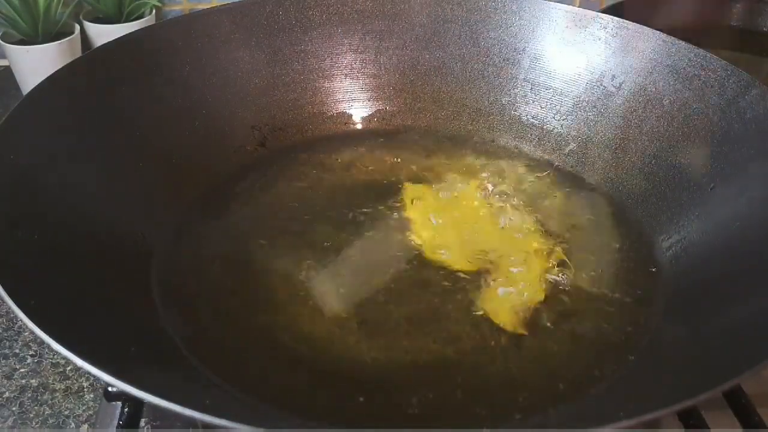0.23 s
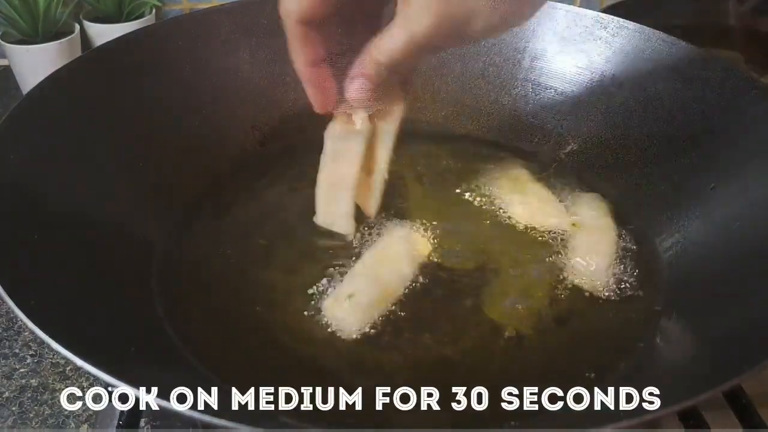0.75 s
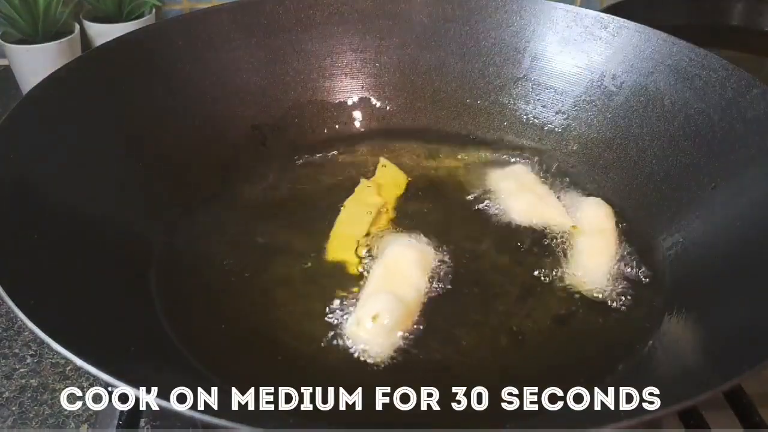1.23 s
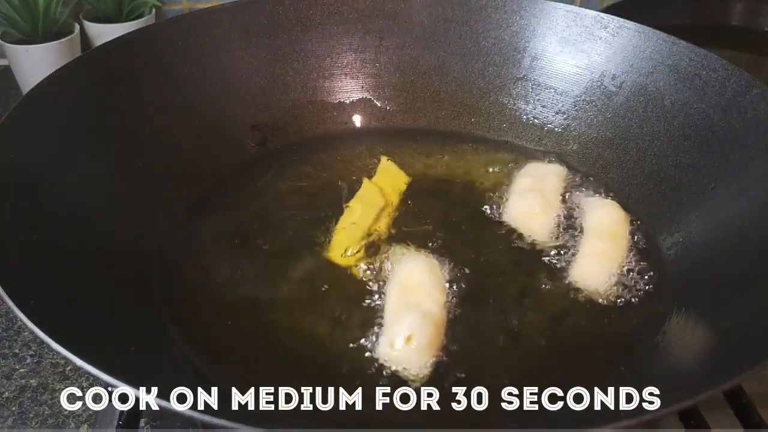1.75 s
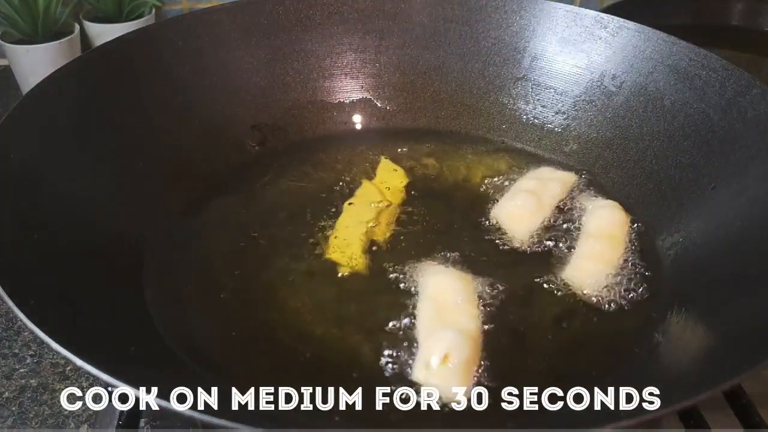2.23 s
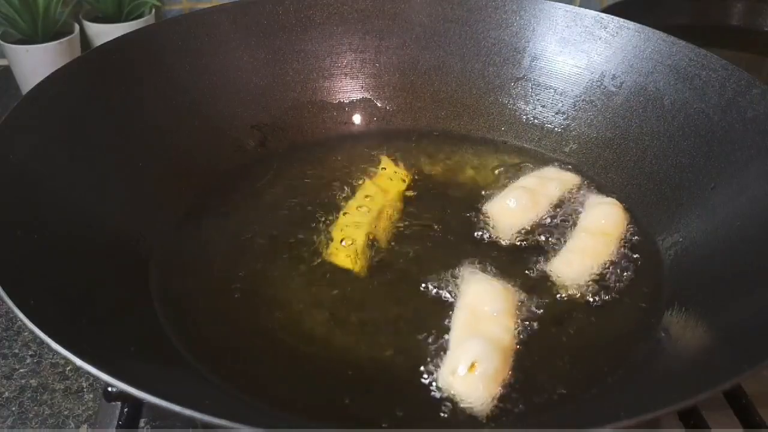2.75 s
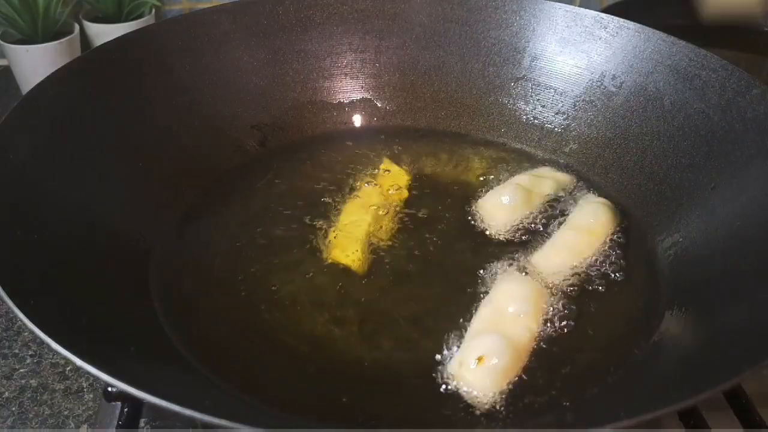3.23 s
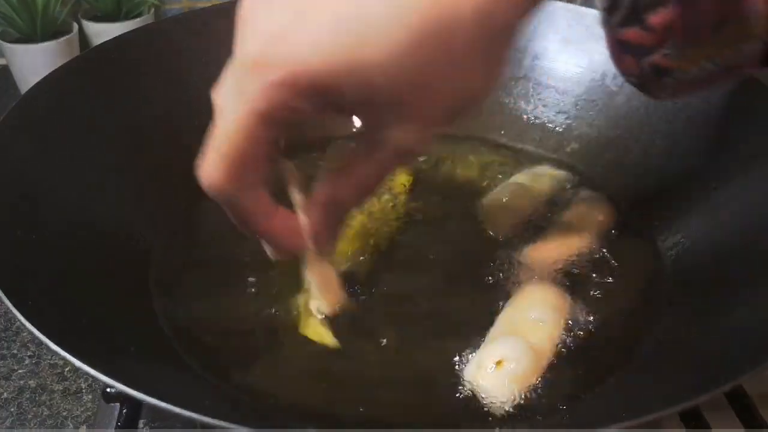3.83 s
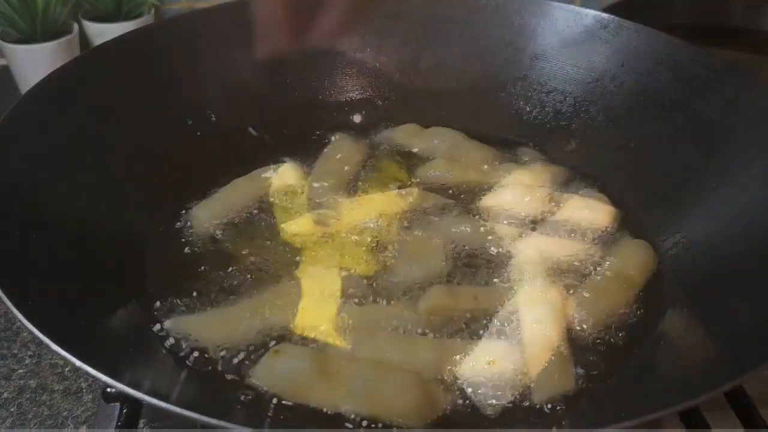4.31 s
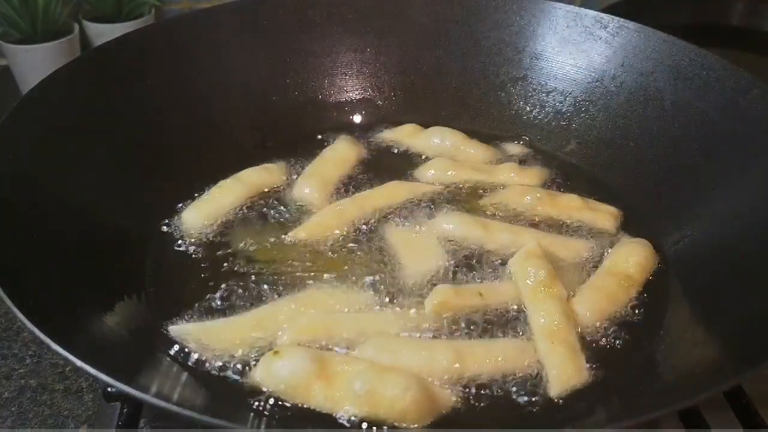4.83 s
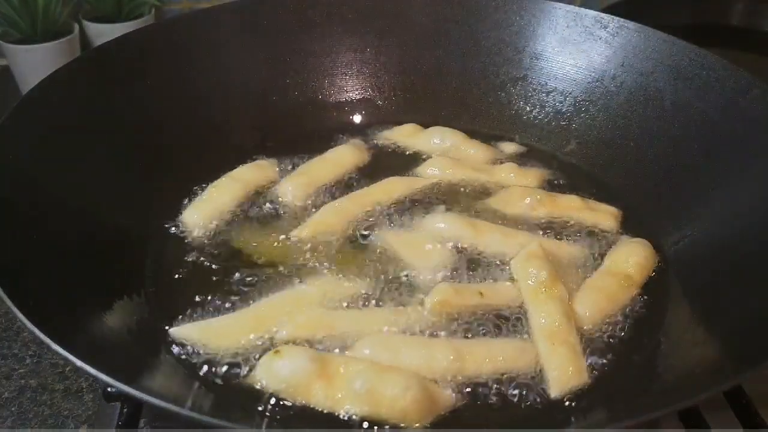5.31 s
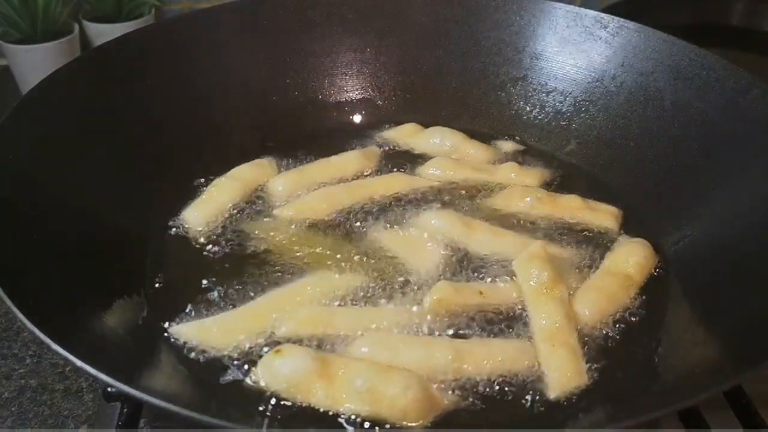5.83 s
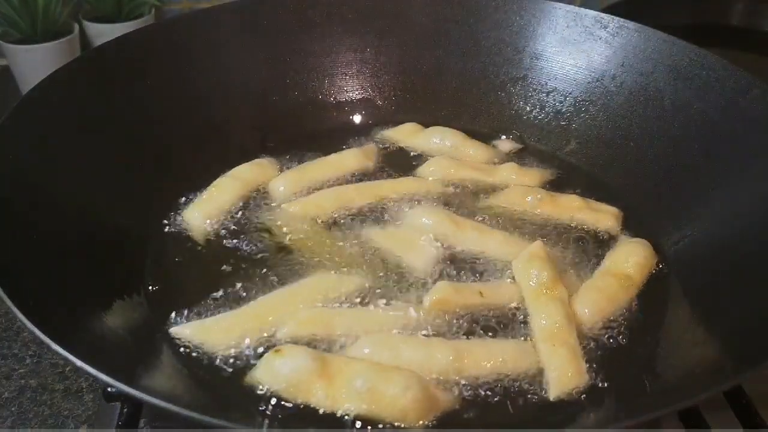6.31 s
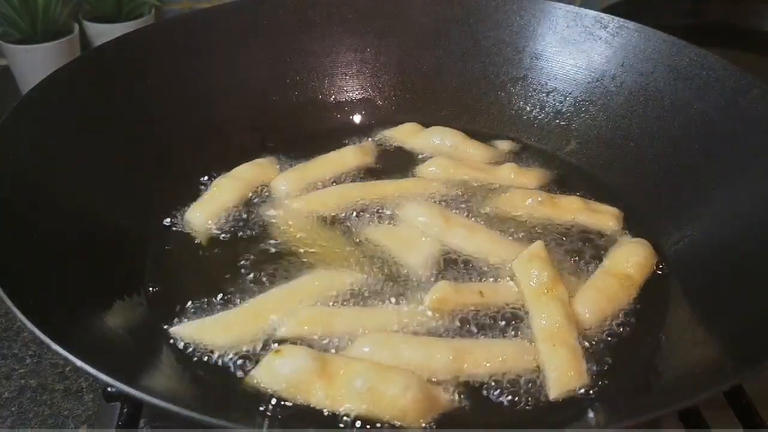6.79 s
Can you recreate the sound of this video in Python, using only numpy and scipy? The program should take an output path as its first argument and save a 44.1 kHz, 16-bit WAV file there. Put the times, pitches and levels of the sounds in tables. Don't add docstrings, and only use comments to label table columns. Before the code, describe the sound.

Outdoors in a reverberant wood, a high trill opens and fades within a second. Sharp upward whistles come in pairs, slightly right, while low chups and faint whistles answer. Around four seconds a finch on the left sings a quick descending song with flourishes and a buzzing close. Distant traffic rushes dully throughout; stereo microphone, birds at moderate distance.

```python
import sys
import numpy as np
from scipy import signal
from scipy.io import wavfile
from scipy.ndimage import uniform_filter1d, map_coordinates

SR = 44100
rng = np.random.default_rng(int(sys.argv[2]) if len(sys.argv) > 2 else 0)


def gain_from_decibels(decibels):
    exponent = np.asarray(decibels, float) / 20
    return 10 ** exponent


def put_to_file(sound):
    columns = np.atleast_2d(sound).T
    safe = np.clip(columns, -1, 1)
    whole_steps = np.round(safe * 32767)
    wavfile.write(sys.argv[1], SR, whole_steps.astype(np.int16))


N = 311346

# frequency in Hz, level in dB per Hz.
AIR = [(4500, -54), (6500, -10), (8000, -2.5), (10000, -1), (13000, -7), (15600, -9.5), (17000, -20)]
AIR_ALIKE = [(1000, .05)]
LEAD = 1
WAVER, WAVER_RATE = .017, 90
RATTLE_RATE, BUZZ_RATE = 136, 65
WARBLER_SIDE_DB, FINCH_SIDE_DB = 7, 6


def unit(x):
    return x / np.sqrt(np.mean(x ** 2) + 1e-20)


def along(points, hz):
    f, v = np.transpose(points)
    return np.interp(np.log(hz + 1), np.log(f + 1), v)


def wobble(rate, size=N):
    knots = rng.standard_normal(size // 40 + 4)
    return map_coordinates(knots, [np.arange(size) * rate / SR])


def glide(length, from_hz, to_hz, edge=.25, waver=0):
    hz = np.linspace(from_hz, to_hz, max(int(length * SR), 8))
    hz = hz * (1 + waver * wobble(WAVER_RATE, size=len(hz)))
    envelope = signal.windows.tukey(len(hz), np.clip(edge, 0, 1))
    return np.sqrt(2) * envelope * np.sin(2 * np.pi * np.cumsum(hz) / SR)


def add(air, s, sound, pan_db, blur_db, near_db, far_db, near_t60=.2, far_t60=1.3, lag=0, straight_db=0):
    t = np.arange(SR) / SR

    def fade(db, t60):
        return gain_from_decibels(db - 60 * t / t60) * np.sqrt(2 * np.log(1000) / t60 / SR)

    side = gain_from_decibels([[pan_db / 2], [-pan_db / 2]])
    depth_onset = 1 - np.exp(-t / 0.033)
    scatter = fade(near_db, near_t60) + fade(far_db, far_t60) * depth_onset
    clumps = gain_from_decibels(2.5 * np.array([wobble(36.0, size=SR), wobble(43.0, size=SR)]))
    decay = side * fade(blur_db, 0.023) + np.sqrt(side) * clumps * scatter
    leaves = signal.butter(4, 7000, fs=SR)
    path = signal.lfilter(*leaves, decay * rng.standard_normal((2, SR)))
    path[[0, 1], [0, lag]] += gain_from_decibels(straight_db) * side[:, 0]
    heard = signal.fftconvolve(sound[None], path, axes=1)
    spot = air[:, round((s + LEAD) * SR):][:, :heard.shape[1]]
    spot += heard[:, :spot.shape[1]]


def add_caller(air):
    # clearing of the tone in seconds, hold in seconds, pitch at the turn in Hz,
    # pitch at the end in Hz, level in dB.
    calls = [
        (1.327, 0.041, 4278, 4222, -21),
        (1.548, 0.028, 4376, 4374, -21),
        (2.9, 0.044, 4132, 4090, -23),
        (3.157, 0.0392, 4345, 3950, -22),
        (7.068, 0.038, 4260, 4200, -28),
    ]
    # time from clearing in seconds, pitch in Hz, whistle and rasp in dB
    climb = [
        (-.046, 1850, -44, -22),
        (-.035, 2300, -32, -9),
        (-.018, 2950, -22, -8),
        (-.008, 3450, -14, -22),
        (-.003, 3900, -8, -35),
        (0, 4196, -2.5, -42),
    ]
    # time from clearing in seconds, frequency in Hz.
    second_pitch = [(-.046, 2800), (-.033, 3600), (-.012, 4200)]
    # frequency ratio, level in dB over the rasp.
    second_lines = [(1, -13), (1.198, -20)]
    # frequency in Hz,
    # gain in dB.
    overtone_gains = [(2800, -14.5), (3900, 0), (4500, -6), (5500, -9.5), (6600, -13), (7300, -30), (8000, -43),
                      (13000, -43.5)]
    turn_share, hold_loss_db = 0.49, -3
    release_s, release_db = .006, -14
    overtone_db = -8
    breath = signal.butter(3, [4200, 7000], "band", fs=SR)

    for clear_s, hold, turn_hz, end_hz, held_db in calls:
        clear_rasp_db = climb[-1][-1]
        held = [(turn_share * hold, turn_hz, 0, clear_rasp_db),
                (hold, end_hz, hold_loss_db, clear_rasp_db),
                (hold + release_s, end_hz, release_db, clear_rasp_db)]
        s, *cols = np.transpose(list(climb) + held)
        t = np.arange(s[0], s[-1], 1 / SR)
        hz, whistle_db, rasp_db = (np.interp(t, s, c) for c in cols)
        whistle_db, rasp_db = whistle_db + held_db, rasp_db + held_db
        phase = 2 * np.pi * np.cumsum(hz) / SR

        def partial(k, db):
            level_db = db + along(overtone_gains, k * hz) + 4.2 * wobble(330, size=len(hz))
            return gain_from_decibels(level_db) * np.sin(k * phase)

        voice = gain_from_decibels(whistle_db + .7 * wobble(110, size=len(hz))) * np.sin(phase)
        voice += partial(2, whistle_db + overtone_db) + partial(3, whistle_db + overtone_db)
        voice += partial(2, rasp_db - 7) + partial(5 / 2, rasp_db - 15)
        voice += partial(4, rasp_db - 1) + partial(9 / 2, rasp_db - 3)
        second = 2 * np.pi * np.cumsum(np.interp(t, *np.transpose(second_pitch))) / SR
        for ratio, db in second_lines:
            voice += gain_from_decibels(rasp_db + db + 5 * wobble(330, size=len(hz))) * np.sin(ratio * second)
        voice += gain_from_decibels(rasp_db - 13) * signal.lfilter(*breath, rng.standard_normal(len(hz)))
        voice *= signal.windows.tukey(len(hz), .12)
        add(air, clear_s + s[0], voice, pan_db=-12, blur_db=-21, near_db=-13, far_db=-6,
            near_t60=0.28, far_t60=1.33, lag=2)


def finch_song():
    # start in seconds, high pitch in Hz,
    # low pitch in Hz, high level in dB, low level in dB.
    steps = [
        (4.068, 5490, 3970, -65, -53),
        (4.268, 4860, 3650, -54, -52),
        (4.460, 4800, 3600, -52, -50),
        (4.651, 4630, 3230, -47, -47.5),
        (4.846, 4050, 3040, -43, -49),
    ]
    # start in seconds, length in seconds, start pitch in Hz,
    # end pitch in Hz, level in dB.
    links = [(3.97, 0.05, 5800, 5600, -69), (4.79, 0.027, 4870, 5020, -55), (4.992, 0.024, 4380, 4030, -52),
             (5.02, 0.018, 3670, 3980, -42), (5.041, 0.022, 3410, 2600, -41.5),
             (5.074, 0.12, 2540, 2350, -65), (5.203, 0.0228, 2750, 3420, -45),
             (5.219, 0.031, 3460, 3235, -45), (5.352, 0.03, 3800, 3730, -63),
             (5.452, 0.022, 3290, 3040, -48.5), (5.797, 0.033, 4235, 4190, -49),
             (5.548, 0.017, 4000, 4380, -52), (5.583, 0.0244, 2910, 2590, -49),
             (5.815, 0.07, 7450, 7260, -74), (5.868, 0.021, 4210, 4130, -47),
             (5.929, 0.081, 3510, 3110, -53)]
    # start in seconds, length in seconds, start pitch in Hz,
    # end pitch in Hz, level in dB.
    lead_ins = [
        (4.231, 0.035, 6300, 5950, -57),
        (4.42, 0.04, 6500, 6000, -54.5),
        (4.608, .05, 5200, 5970, -53.5),
        (4.795, 0.034, 4670, 5100, -46),
        (4.877, .03, 3470, 2900, -58),
        (4.975, .04, 4780, 5200, -54),
        (5.078, .045, 3210, 2880, -41),
        (4.69, .04, 3900, 3360, -42),
        (5.705, .068, 5850, 5200, -51),
    ]
    # start in seconds, length in seconds, start pitch in Hz,
    # end pitch in Hz, level in dB.
    buzz = [
        (5.768, .031, 4370, 4150, -40),
        (5.812, .062, 3590, 3290, -35.5),
        (5.874, .016, 3050, 3100, -34.5),
        (5.891, .031, 2980, 2790, -39.5),
        (5.925, .031, 2504, 2300, -41),
    ]
    # start in seconds, level in dB.
    flourishes = [
        (5.315, -43),
        (5.492, -45),
    ]
    # start after the flourish in seconds, length in seconds,
    # start pitch in Hz, end pitch in Hz, level in dB over the flourish.
    opening = [
        (0.001, .03, 5000, 4200, -1),
        (.032, .022, 2780, 2274, -2),
    ]
    # start after the flourish in seconds, length in seconds,
    # start pitch in Hz, end pitch in Hz, level in dB over the flourish.
    closing = [
        (-.002, .009, 5250, 5050, -5),
        (.006, .009, 4900, 4200, -3),
        (.014, .009, 4150, 3550, 2),
        (.023, .011, 3450, 3000, 2),
        (.037, .014, 2800, 2150, -6),
        (.058, .014, 2050, 2450, -4),
        (.072, .012, 2750, 3250, 0),
        (.083, .016, 3150, 3400, 2),
    ]
    scoop_s, scoop_db, scoop_from = .006, -3.5, .85
    high_s, low_at_s, low_s = .03, .052, .085
    drop_at_s, drop_s, drop_db = .032, .018, -.5
    drop_from, drop_to, sag = .95, .88, .98

    notes = list(links)
    for s, high_hz, low_hz, high_db, low_db in steps:
        louder_db = max(low_db, high_db)
        notes += [
            (s - scoop_s, scoop_s, scoop_from * high_hz, high_hz, high_db + scoop_db),
            (s, high_s, high_hz, sag * high_hz, high_db),
            (s + drop_at_s, drop_s, drop_from * high_hz, drop_to * low_hz, louder_db + drop_db),
            (s + low_at_s, low_s, low_hz, sag * low_hz, low_db)]

    def flourish(parts):
        return [(s + after, *shape, db + over_db)
                for s, db in flourishes for after, *shape, over_db in parts]

    rattles = [(*row, RATTLE_RATE) for row in list(lead_ins) + flourish(opening)]
    rattles += [(*row, BUZZ_RATE) for row in buzz]
    return notes + flourish(closing), rattles


def add_finch(air):
    notes, rattles = finch_song()
    for s, length, from_hz, to_hz, db in notes:
        note = glide(length, from_hz, to_hz, edge=0.049, waver=WAVER / 2)
        note = gain_from_decibels(db - 4.5 + 3 * wobble(81, size=len(note))) * note
        add(air, s, note, FINCH_SIDE_DB, blur_db=-2.5, near_db=4, far_db=4.5,
            near_t60=0.5, far_t60=1.5, straight_db=2)
    for s, length, from_hz, to_hz, db, rate in rattles:
        centres = np.linspace(from_hz, to_hz, max(round(length * rate), 1))
        if rate == BUZZ_RATE:
            fill, swing_hz, straight_db, blur_db, near_db = .55, 520, 6, -2, 2
        else:
            fill, swing_hz, straight_db, blur_db, near_db = .7, 750, 1, 1, 3
            centres = centres + (swing_hz / 4) * rng.standard_normal(len(centres))
        gap = int((1 - fill) / rate * SR)
        flicks = []
        for hz in centres:
            flick = glide(fill / rate, hz + swing_hz, hz - swing_hz, edge=0.66, waver=WAVER)
            flicks.append(np.pad(flick, (0, gap)))
        add(air, s, gain_from_decibels(db - 11.0) * np.concatenate(flicks), FINCH_SIDE_DB, blur_db, near_db,
            far_db=10, near_t60=0.29, far_t60=1.0, straight_db=straight_db)


def add_warbler(air):
    # time of the turn in seconds, top pitch in Hz, level in dB.
    syllables = [(-.16, 6100, -45), (-.085, 6100, -45), (-.010, 6200, -42), (0.067, 6300, -38),
                 (0.143, 6400, -39), (0.221, 6300, -46), (0.302, 6700, -51), (0.381, 6840, -50),
                 (.458, 6800, -44), (0.536, 6500, -43), (.620, 6600, -50), (0.706, 6700, -52),
                 (0.792, 6700, -53), (0.884, 6700, -52)]
    # time after the turn in seconds, share of the top pitch, level in dB.
    swoop = [
        (-.016, .86, -9),
        (-.011, .93, -3),
        (0, 1.0, 0),
        (.005, .84, -2),
        (.010, .89, -1),
        (.014, .72, -6),
        (.019, .58, -17),
        (.024, .4, -30),
    ]
    scatter_near_db, scatter_depth_db, fading_db_per_s = -51.5, -39.5, -3
    tick_db, tick_wet_db = -18, 4

    after, *cols = np.transpose(swoop)
    t = np.arange(after[0], after[-1], 1 / SR)
    share, fade_db = (np.interp(t, after, c) for c in cols)
    for s, top_hz, db in syllables:
        wavering = share * (1 + WAVER * wobble(WAVER_RATE, size=len(share)))
        tone = np.sin(2 * np.pi * top_hz * np.cumsum(wavering) / SR)
        syllable = np.sqrt(2) * gain_from_decibels(db + fade_db) * signal.windows.tukey(len(share), .25) * tone
        octave = gain_from_decibels(db - 10) * glide(0.008, 7100, 5000, edge=0.6)
        syllable[-len(octave) - 220:-220] += octave
        tick = gain_from_decibels(db + tick_db) * glide(0.0091, 4110, 5180, edge=0.82, waver=WAVER)
        fading_db = fading_db_per_s * s - db
        add(air, s + after[0], syllable, WARBLER_SIDE_DB, blur_db=-33.0,
            near_db=scatter_near_db + fading_db, far_db=scatter_depth_db + fading_db,
            near_t60=0.45, far_t60=0.94)
        wet_db = fading_db - tick_db + tick_wet_db
        add(air, s - .004, tick, WARBLER_SIDE_DB / 2, blur_db=0,
            near_db=scatter_near_db + wet_db, far_db=scatter_depth_db + wet_db,
            near_t60=0.3, far_t60=0.98)


def add_far_birds(air):
    # start in seconds, level in dB.
    chup_times = [
        (1.036, -49),
        (2.08, -41),
        (2.208, -45),
        (2.43, -46),
        (2.582, -41),
        (2.735, -47),
    ]
    # start in seconds, length in seconds, start pitch in Hz,
    # end pitch in Hz, level in dB.
    ahead = [(.785, .04, 1800, 1520, -45), (.83, .025, 1334, 1200, -40), (.908, 0.026, 2360, 2700, -47),
             (.938, 0.05, 2380, 2600, -44), (.995, 0.022, 2600, 2700, -49), (1.02, 0.022, 2900, 3200, -49),
             (1.05, 0.021, 2700, 2550, -49), (1.11, 0.025, 2350, 2200, -47), (1.17, 0.03, 2300, 2750, -49),
             (1.708, 0.013, 2180, 2560, -44), (1.724, .045, 2460, 2600, -43),
             (1.903, 0.011, 2170, 2570, -50), (1.914, 0.033, 2546, 2480, -43.5)]
    # start in seconds, length in seconds, start pitch in Hz,
    # end pitch in Hz, level in dB.
    left = [
        (1.05, 0.046, 4100, 4000, -57.5),
        (1.783, 0.14, 5380, 4955, -63.5),
        (2.475, 0.11, 4550, 4560, -56.5),
        (2.545, 0.042, 4320, 4320, -53.5),
        (2.625, 0.085, 3710, 3710, -58),
        (2.70, .09, 3830, 3980, -59),
        (2.745, 0.14, 4200, 4150, -57),
    ]
    # start in seconds, length in seconds, start pitch in Hz,
    # end pitch in Hz, level in dB.
    right = [
        (6.295, .08, 4340, 4310, -59),
        (6.42, .07, 4150, 4150, -67),
        (6.47, .13, 4340, 4350, -62),
        (6.63, .06, 4350, 4360, -65),
        (6.71, .06, 4340, 4380, -59),
        (6.66, .2, 4150, 4150, -69),
        (6.8, .17, 4350, 4340, -66),
    ]
    chups = [(s, .022, 2650, 1900, db) for s, db in chup_times]
    low_wet_db, high_wet_db = -5.5, 1.5
    birds = [(chups, -1.5, low_wet_db, 2 * WAVER), (ahead, -4, low_wet_db, 2 * WAVER),
             (left, 13.5, high_wet_db, WAVER / 2), (right, -8.5, high_wet_db, WAVER / 5)]
    for rows, pan_db, wet_db, waver in birds:
        for s, length, from_hz, to_hz, db in rows:
            note = glide(length, from_hz, to_hz, edge=0.24, waver=waver)
            note *= gain_from_decibels(db - 6 + 4 * wobble(90, size=len(note)))
            add(air, s, note, pan_db, blur_db=-2, near_db=wet_db - 1.5, far_db=wet_db + 3.5,
                near_t60=.3, far_t60=1.2, straight_db=-2)


def add_twigs(air):
    # start in seconds, peak level in dB, left-right difference in dB.
    twigs = [
        (4.0194, -67, 2),
        (4.4573, -72, -2),
        (5.311, -59, 9),
        (6.117, -70, 13),
        (6.2262, -44, 16),
        (6.7738, -62, -5),
    ]
    t = np.arange(400) / SR
    band = signal.butter(2, [4000, 13000], "band", fs=SR)
    for s, db, pan_db in twigs:
        snap = signal.lfilter(*band, rng.standard_normal(len(t))) * gain_from_decibels(-60 * t / 0.0085)
        add(air, s, gain_from_decibels(db - 10.0) * snap, pan_db, blur_db=-7, near_db=-15, far_db=-17, near_t60=.08)


def rush(spectrum, alike, patchy_db):
    # frequency in Hz, left-right difference in dB.
    lean_points = [(60, 1.5), (300, 0), (800, 0), (2500, -2), (7000, 3.5)]
    hz, _, z = signal.stft(rng.standard_normal((2, N)), SR, nperseg=1024)
    field = uniform_filter1d(rng.standard_normal(z.shape[1:]), size=8, axis=0)
    field = uniform_filter1d(field, size=6, axis=1)
    turn = np.arccos(np.clip(along(alike, hz), -1, 1))[:, None] / 2
    mid, side = z[0] * np.cos(turn), z[1] * np.sin(turn)
    lean = gain_from_decibels(np.outer([.5, -.5], along(lean_points, hz)))[..., None]
    gain = gain_from_decibels(along(spectrum, hz)[:, None] + patchy_db * unit(field))
    noise = signal.istft(gain * lean * [mid + side, mid - side], nperseg=1024)[1]
    return unit(noise[:, :N])


def background():
    # time in seconds, level in dB.
    traffic_course = [
        (0, -45),
        (.94, -44.5),
        (1.7, -45),
        (2.7, -46.5),
        (3.601, -48),
        (4.4, -49),
        (4.85, -48.5),
        (6.55, -48.5),
        (7.06, -50.5),
    ]
    # frequency in Hz, level in dB per Hz.
    traffic_spectrum = [(15, -48.5), (25, -17), (55, -41.5), (195, -27), (370, -15.5), (457, -9.5),
                        (974, 2.5), (1290, 1.5), (2570, -6), (3930, -6.5), (4220, -9), (4740, -15),
                        (7090, -28.5), (9220, -46.5), (15600, -120)]
    # frequency in Hz, left-right likeness as a share.
    traffic_alike = [(40, 1), (150, 0.71), (400, 0.73), (1000, 0.76), (2500, 0.026), (6600, 0.049)]
    traffic_db = np.interp(np.arange(N) / SR, *np.transpose(traffic_course))
    sway_db = .45 * np.array([wobble(4.5), wobble(2.5)])
    roar = rush(traffic_spectrum, traffic_alike, patchy_db=1.04)
    traffic = gain_from_decibels(traffic_db + 0.55 + sway_db[0]) * roar
    hiss = gain_from_decibels(-78 + sway_db[1]) * rush(AIR, AIR_ALIKE, patchy_db=0.5)
    return traffic + hiss


def scene():
    air = np.zeros((2, N + LEAD * SR))
    for add_voice in (add_caller, add_warbler, add_finch, add_far_birds, add_twigs):
        add_voice(air)
    return air[:, LEAD * SR:] + background()


def roll_off(x):
    return signal.sosfilt(signal.butter(12, 15720, fs=SR, output="sos"), x)


def record(dry):
    treble = np.diff(dry, n=2, prepend=[[0, 0], [0, 0]])
    treble_rms = np.sqrt(np.abs(uniform_filter1d(treble ** 2, size=500)))
    loudness = treble_rms ** 0.56
    fizz = gain_from_decibels(-52.5) * loudness * rush(AIR, AIR_ALIKE, patchy_db=6)
    return roll_off(dry + fizz)


dry = scene()
out = record(dry)
put_to_file(out)
```